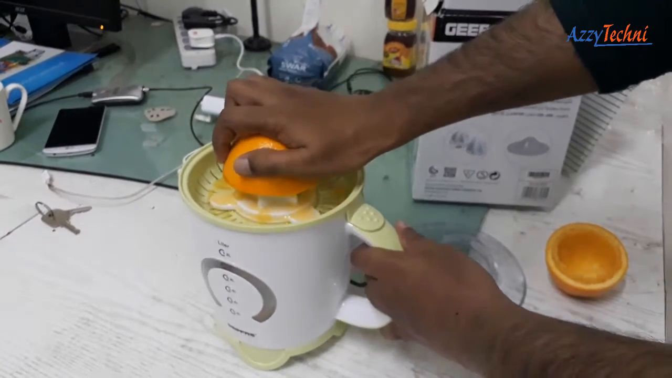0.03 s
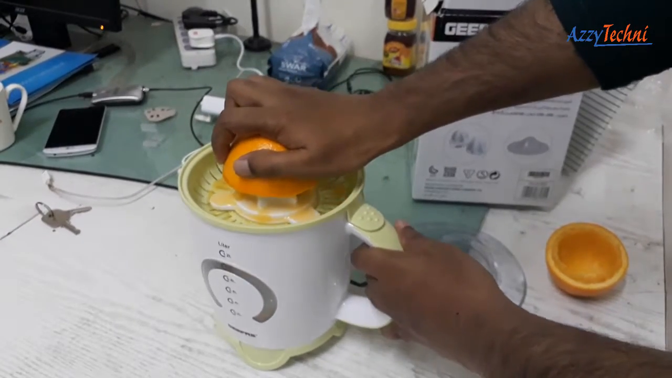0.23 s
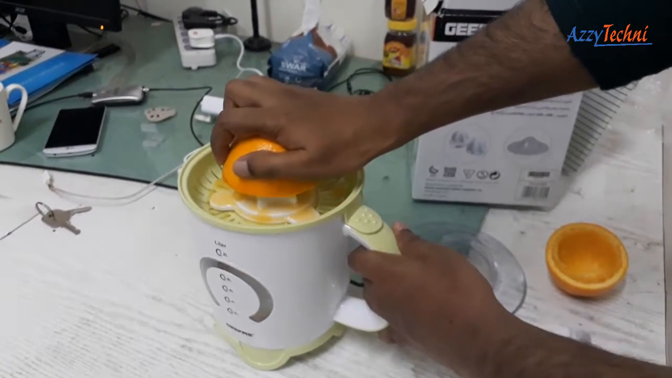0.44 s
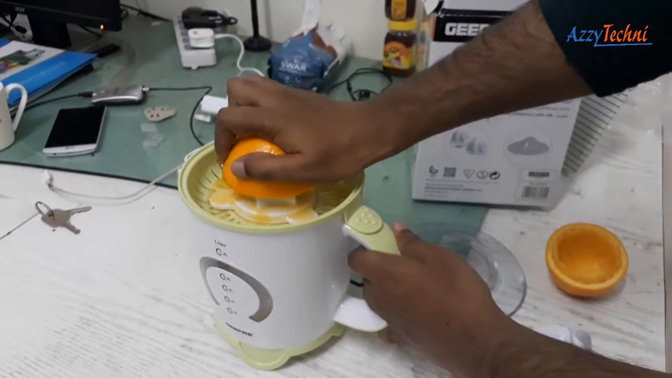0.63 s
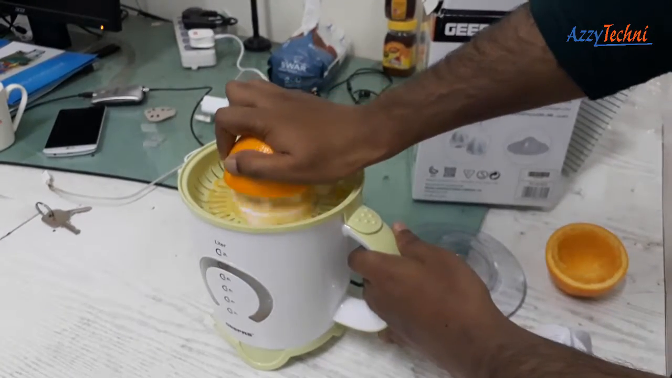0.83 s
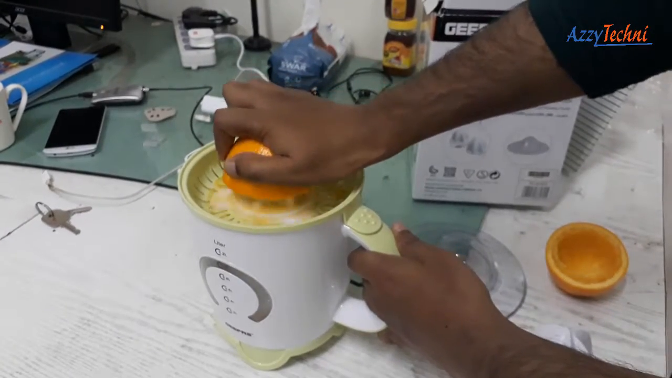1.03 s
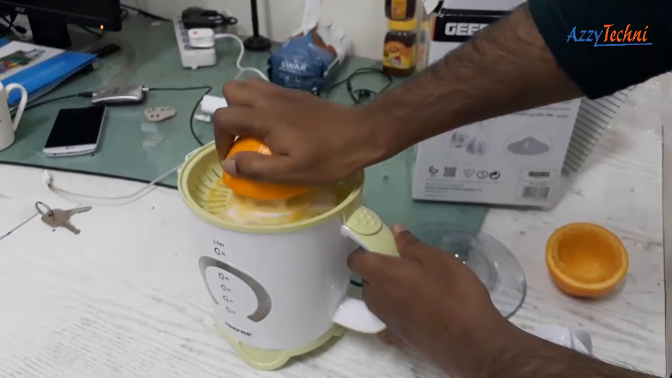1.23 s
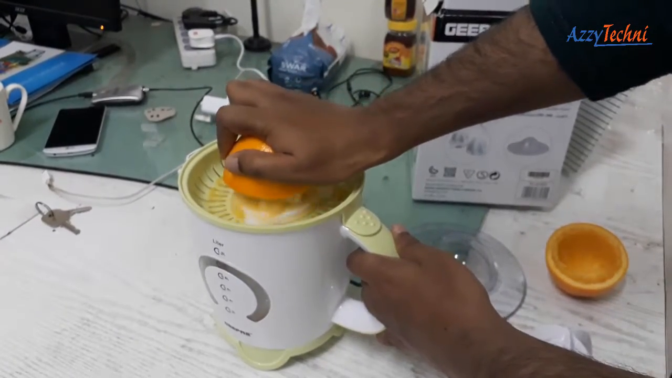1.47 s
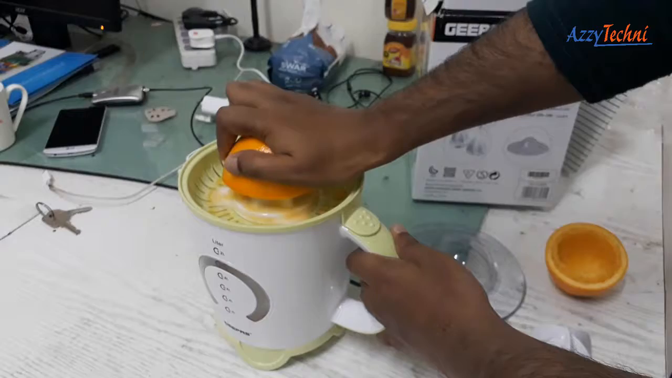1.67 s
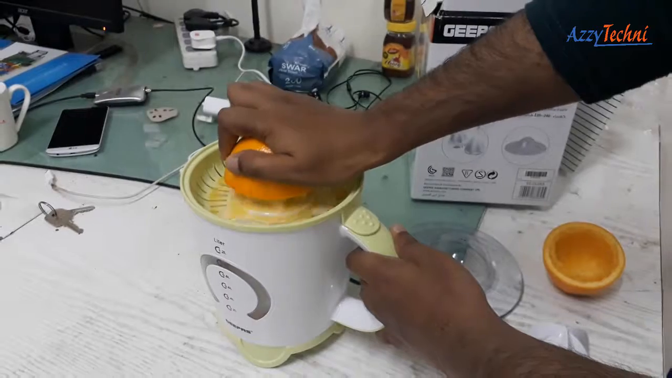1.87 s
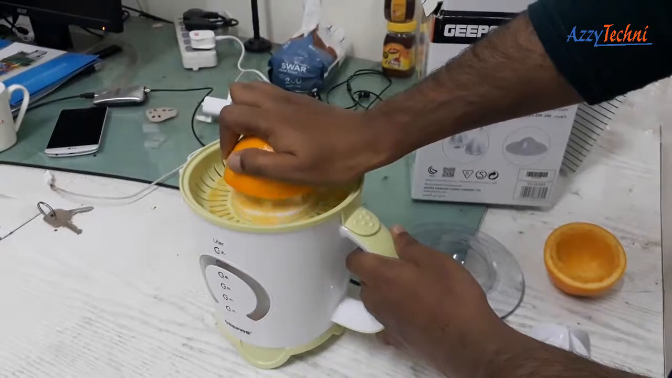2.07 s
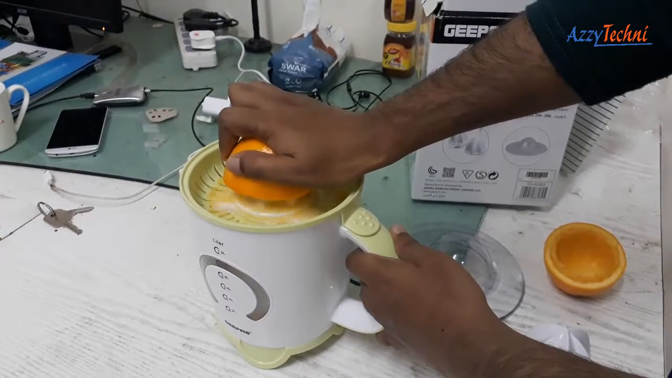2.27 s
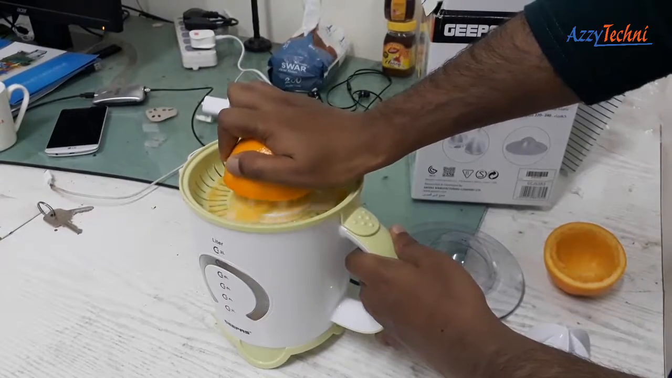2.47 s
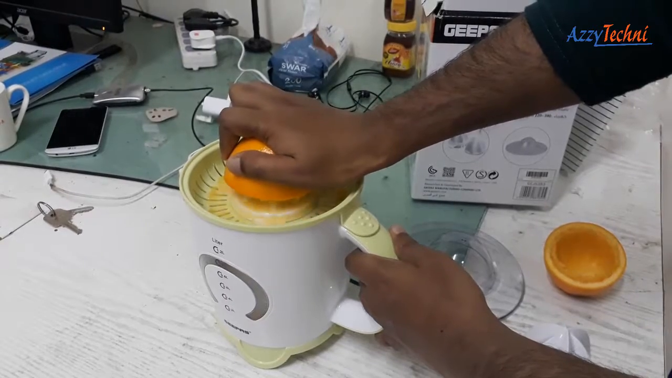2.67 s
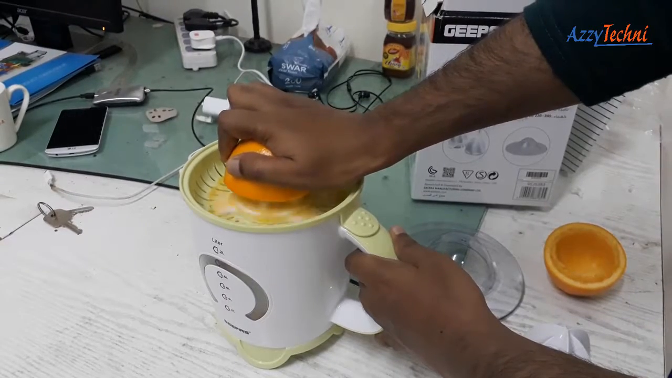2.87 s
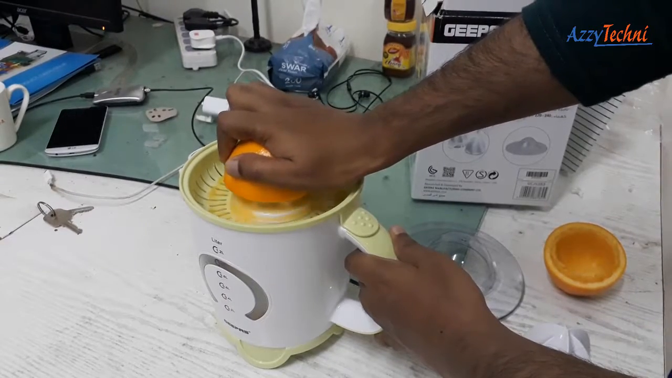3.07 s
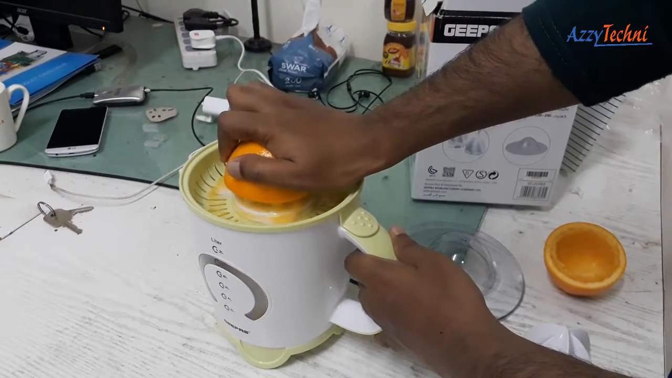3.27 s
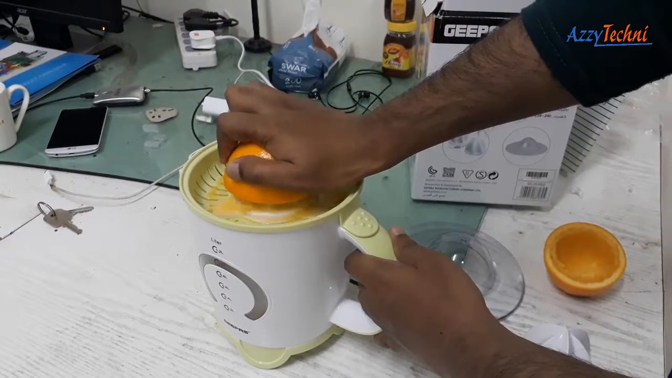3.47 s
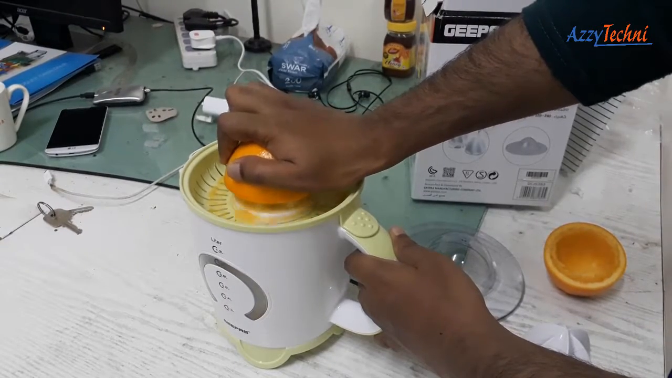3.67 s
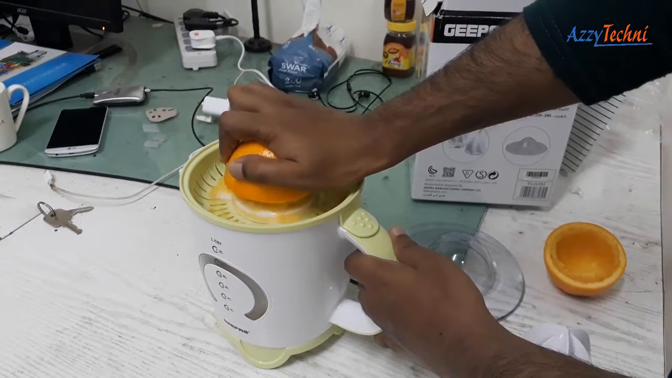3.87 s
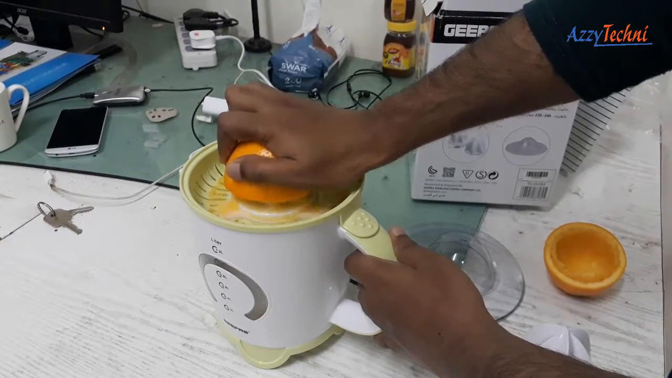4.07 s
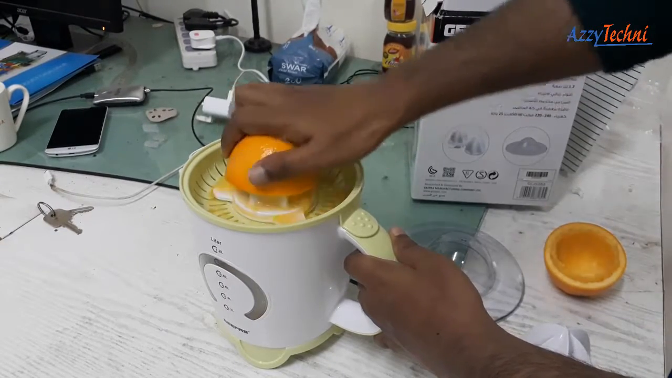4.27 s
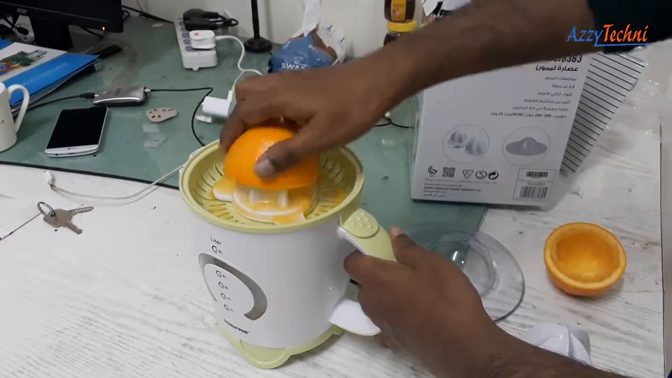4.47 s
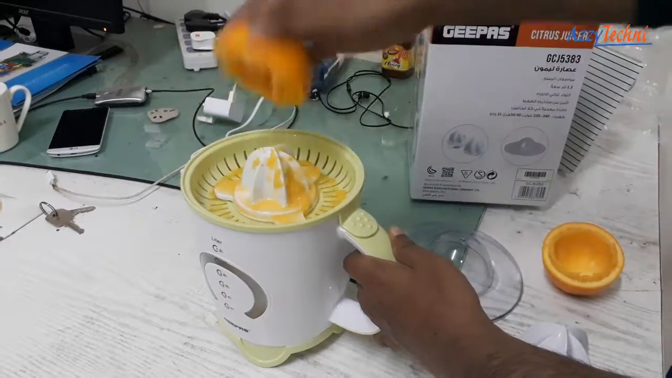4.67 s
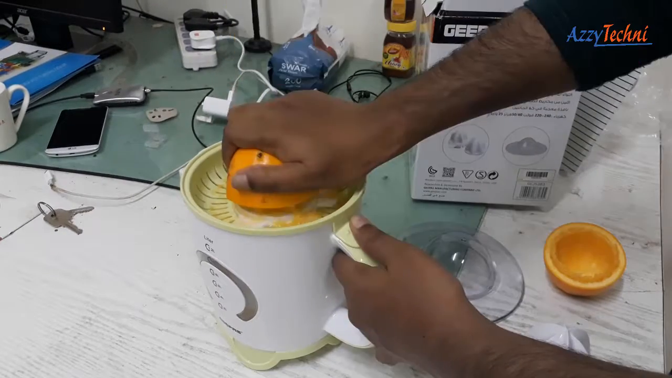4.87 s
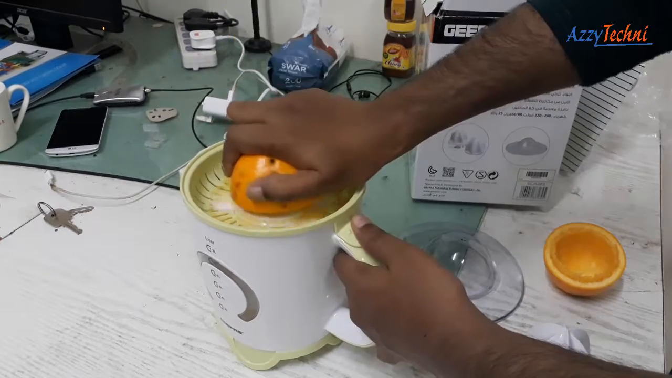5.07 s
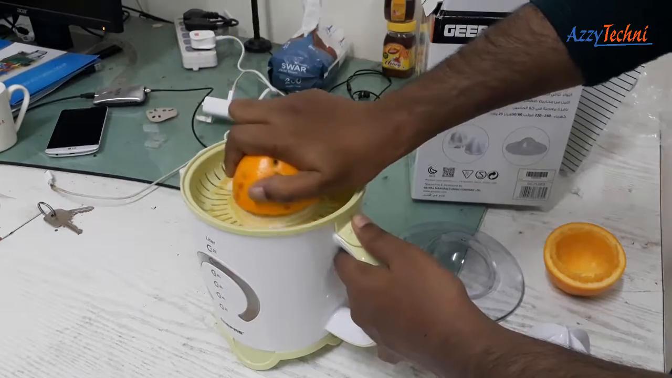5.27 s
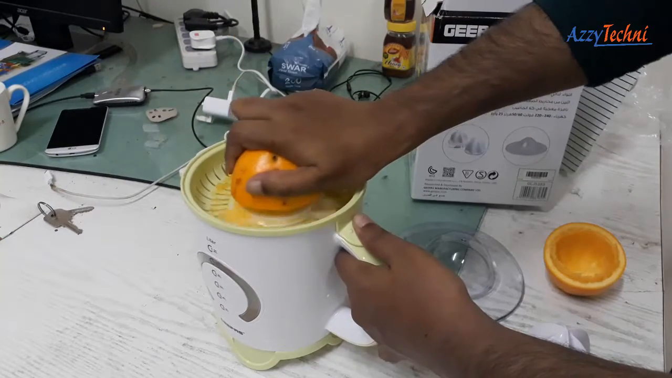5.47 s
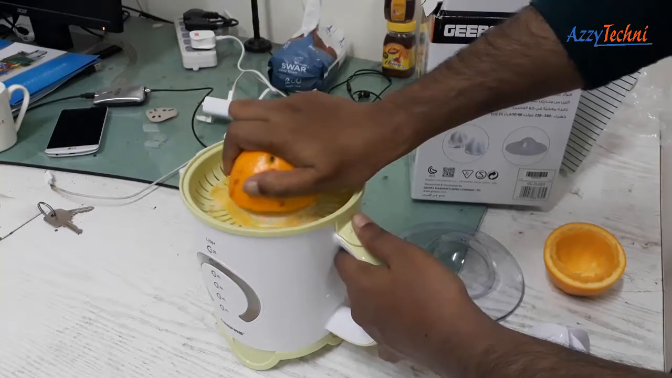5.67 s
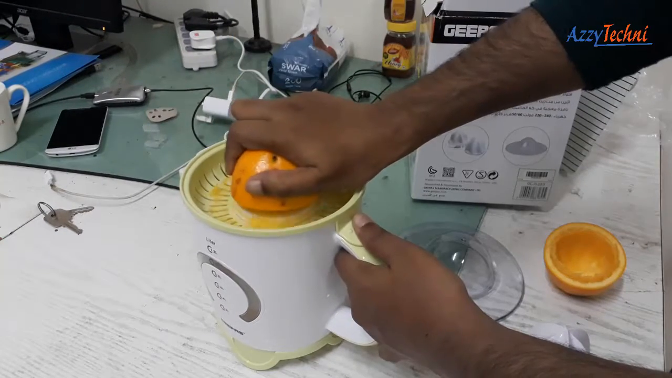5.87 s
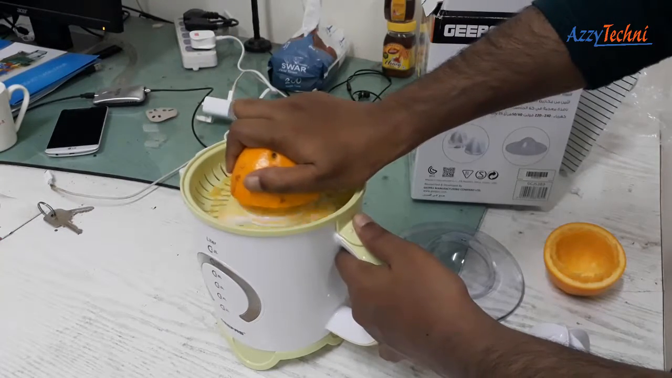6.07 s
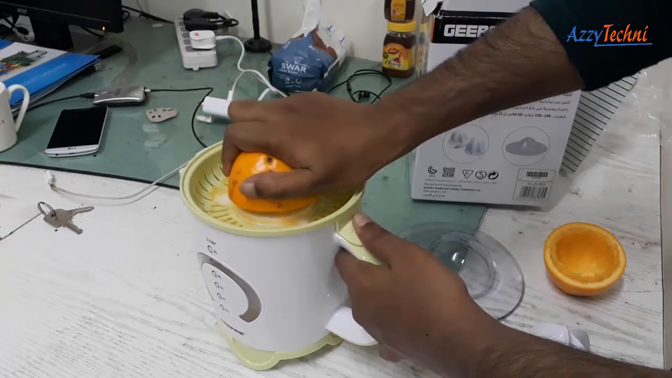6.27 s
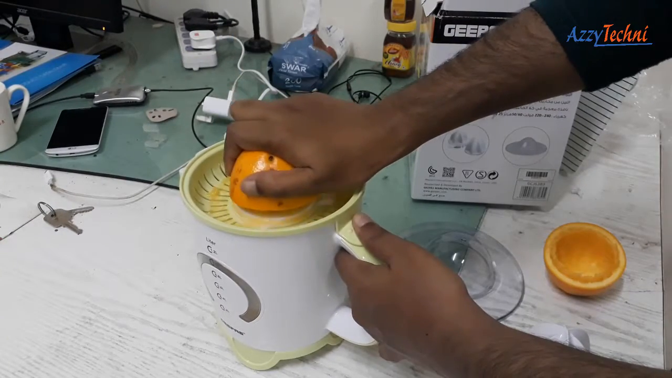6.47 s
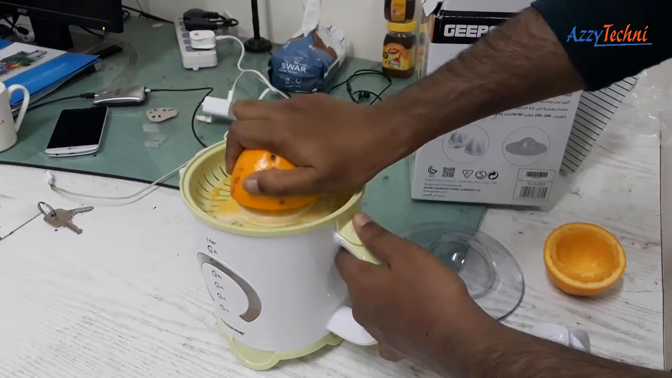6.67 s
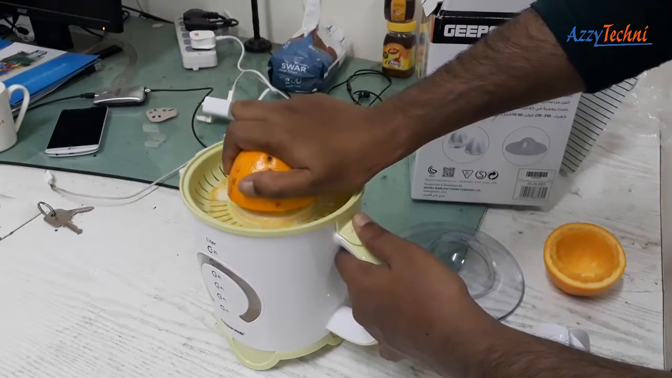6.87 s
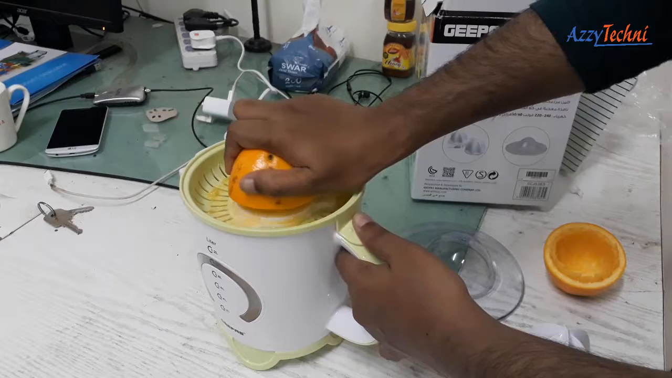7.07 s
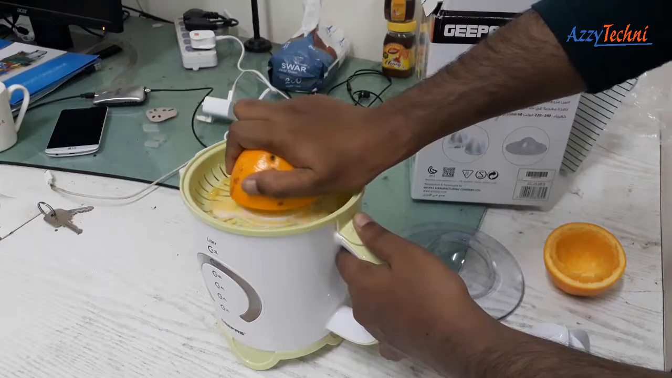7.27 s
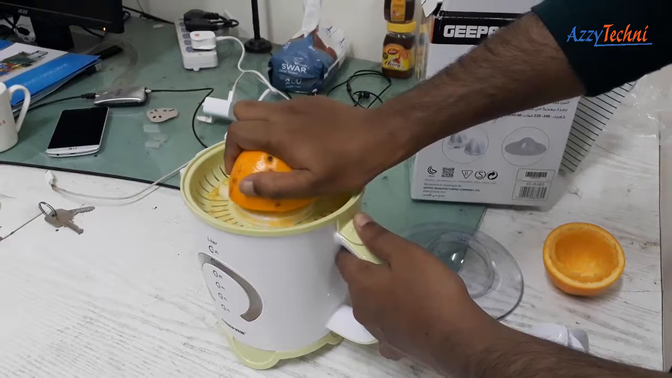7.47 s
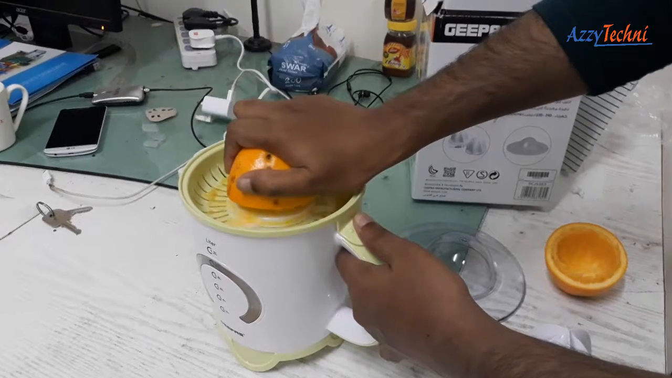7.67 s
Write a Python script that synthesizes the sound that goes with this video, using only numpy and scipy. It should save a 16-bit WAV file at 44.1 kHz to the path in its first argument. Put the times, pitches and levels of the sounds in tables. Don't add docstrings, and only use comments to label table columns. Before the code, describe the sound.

Over low fan noise, a plastic juicer clatters to life, whirs roughly under changing hand pressure, cuts out, and restarts with a slightly different tone.

```python
import sys
import numpy as np
from scipy import signal
from scipy.fft import rfft, irfft
from scipy.io import wavfile
from scipy.ndimage import uniform_filter1d

SR = 44100
rng = np.random.default_rng(int(sys.argv[2]) if len(sys.argv) > 2 else 0)


def gain_from_db(level_db):
    decades = np.asarray(level_db, float) / 20
    return 10 ** decades


def generate_wav(signal):
    frames = np.transpose(np.atleast_2d(signal))
    scaled = np.clip(frames, -1, 1) * 32767
    pcm = np.round(scaled).astype(np.int16)
    wavfile.write(sys.argv[1], SR, pcm)


N = 340011
t = np.arange(N) / SR
MAINS_HZ, GEAR_TURN_HZ = 60, 7.2


def level(x, db):
    return x * gain_from_db(db) / np.sqrt(np.mean(x ** 2))


def ring(x, hz, width):
    b, a = signal.iirpeak(hz, hz / (1.306 * width), fs=SR)
    once = signal.lfilter(b, a, x)
    return signal.lfilter(b, a, once)


def walk(rate):
    hold = int(SR / rate)
    steps = np.repeat(rng.standard_normal(N // hold + 1), hold)
    return 1.03 * uniform_filter1d(steps, hold)[:N]


def span(on_s, off_s):
    return uniform_filter1d(1. * ((t >= on_s) & (t <= off_s)), size=200)


def curve(table):
    s, *columns = np.transpose(table)
    return span(s[0], s[-1] + 1e-3), [np.interp(t, s, c) for c in columns]


def burst(s, ms):
    out = np.zeros(N)
    near = slice(int(s * SR), int((s + .1) * SR))
    u = np.clip(t[near] - s, 0, 1) / (max(ms, .5) / 1000)
    out[near] = (u * np.exp(1 - u)) ** 2
    return out


# f/Hz, level/dB per Hz
FAN_SPECTRUM = [(20, -37), (135, -7), (265, -11.5), (390, -8), (640, -12.5), (2240, -18.5), (3100, -30.5),
                (4200, -71)]
# f/Hz, width/Hz, level/dB
FAN_TONES = [(139.7, 19, -47.5), (194, 13.8, -47), (236.6, 5, -52), (352.2, 7.9, -53)]


def fan():
    hz, db = np.transpose(FAN_SPECTRUM)
    f = np.fft.rfftfreq(N, 1 / SR) + 1
    shape = gain_from_db(np.interp(np.log(f), np.log(hz), db))
    drone = irfft(rfft(rng.standard_normal(N)) * shape, N)
    tones = 0
    for tone_hz, width, tone_db in FAN_TONES:
        tones = tones + level(ring(rng.standard_normal(N), tone_hz, width), tone_db)
    return level(drone, -39.5) + tones


def microphone_hiss():
    noise = rng.standard_normal(N)
    hiss = ring(noise, 3800, 1500) + gain_from_db(-2.5) * ring(noise, 6400, 9000)
    return level(hiss, -69.5)


# t/s, f/Hz, level/dB
SQUEAK = [(0, 12400, -86), (.04, 12800, -80), (.1, 13000, -80), (.16, 13300, -78), (.19, 13000, -77),
          (.215, 12100, -80), (.23, 11900, -95)]
# t/s, level/dB
EARLY_FIZZ = [
    (0, -75),
    (.08, -67),
    (.2, -73),
    (.27, -85),
]
# t/s, level/dB, duration/ms, f/Hz
TAPS = [(.066, -68, 4, 4300), (.066, -59, 4.3, 7400), (.066, -59, 5.5, 9900), (.068, -72, 4.5, 14300),
        (.754, -58, 4.9, 7600), (6.618, -45, 2, 6260), (.66, -68, 4, 8300), (4.53, -75, 19.7, 8300),
        (4.952, -49, 12, 4600), (4.98, -51, 8, 4900)]


def handling():
    gate, (hz, db) = curve(SQUEAK)
    rub = gate * gain_from_db(db + 3.0 * walk(60)) * np.sin(2 * np.pi * np.cumsum(hz) / SR)
    gate, (db,) = curve(EARLY_FIZZ)
    early_fizz = gate * gain_from_db(db) * level(ring(rng.standard_normal(N), 4500, 1400), 0)
    noise = rng.standard_normal(N)
    taps = 0
    for s, tap_db, ms, tap_hz in TAPS:
        taps = taps + burst(s, ms) * level(ring(noise, tap_hz, 1200), tap_db)
    return rub + early_fizz + taps


# first t/s, last t/s
SEAMS = [
    (.0224, 4.6),
    (4.6119, 7.71),
]
SEAM_S = .021323
# t/s, treble peak level/dB
BAD_SEAMS = [(.8114, -47), (.982, -50), (1.1099, -50), (1.3231, -50), (1.9201, -50), (2.0481, -48),
             (2.3466, -50), (2.4532, -49), (2.6239, -50), (2.7091, -46), (2.9224, -47), (3.2209, -46),
             (3.4554, -46), (3.6047, -48), (3.9459, -47), (3.9885, -49), (4.0099, -47), (4.8941, -51),
             (5.209, -49), (5.8061, -47), (5.9767, -50), (6.0194, -47), (6.2752, -50), (6.5098, -42),
             (7.2561, -48), (7.512, -47), (7.5759, -47)]


def seam_ticks(wave):
    slip_db, most = -10, gain_from_db(-35)
    x = np.zeros(N)
    times = np.concatenate([np.arange(first, last, SEAM_S) for first, last in SEAMS])
    at = (times * SR).astype(int)
    x[at] = np.clip(gain_from_db(slip_db) * np.gradient(wave)[at], -most, most)
    for s, db in BAD_SEAMS:
        x[int(s * SR)] = gain_from_db(db + 17.0)
    return signal.sosfilt(signal.butter(2, 6500, "high", fs=SR, output="sos"), x)


# switch closes t/s, rotor grips t/s, stalled level/dB re running, switch opens t/s
RUNS = [
    (0.769, 0.787, -12, 4.223),
    (4.896, 4.945, -5, 7.8),
]
# t/s, chatter level/dB, pressure/0-1
PRESS = [
    [(.79, -21.5, 0.1), (.95, -22, 0.44), (1.28, -20, 0.35), (1.56, -22, 0.3), (2.39, -23, 0.58),
     (2.85, -23.5, 0.7), (3.5, -23, 0.93), (4.06, -22.5, 0.6), (4.18, -19, 0)],
    [(4.95, -21.5, 0.2), (5.1, -24.5, .9), (5.3, -21.5, 0.62), (5.8, -21, 0.12), (6.47, -22, 0.37),
     (6.9, -23, 0.75), (7.31, -22, 0.77), (7.7, -21, 0.5)],
]
# free level/dB, gain at full pressure/dB, start-up extra/dB
COUPLING = [
    [(-8, 6.5, 0), (-3.5, 5.5, 1.5), (-31.5, 3, 7.5)],
    [(-7.5, 5.5, 2), (-7.5, 3, 5), (-38, 5, 7.5)],
]
STALL_FIZZ_DB = [-2, -6]


def motor(k):
    grip_duration_s, settle_s = .008, 0.063
    coast_db_per_s, coast_s = -220, .15
    on_s, grip_s, stall_db, off_s = RUNS[k]
    _, (db, pressure) = curve(PRESS[k])
    stalled = np.clip((grip_s + grip_duration_s / 2 - t) / grip_duration_s, 0, 1)
    coast_db = coast_db_per_s * np.clip(t - off_s, 0, 1)
    settling = np.exp(-np.clip(t - grip_s, 0, 9) / settle_s)
    bands = []
    for free_db, gain_db, new_db in COUPLING[k]:
        bands.append(free_db + gain_db * pressure + new_db * settling)
    low_db, ring_db, fizz_db = bands
    fizz_db = fizz_db + STALL_FIZZ_DB[k] * stalled
    return span(on_s, off_s + coast_s), db + stall_db * stalled + coast_db, (low_db, ring_db, fizz_db)


def chatter(per_s, spread_db):
    hit = rng.random(N) < per_s / SR
    size = rng.standard_normal(N) * gain_from_db(spread_db * rng.standard_normal(N))
    return level(hit * size, 0)


def housing(modes, steady, throb):
    out = 0
    for hz, width, db, share in modes:
        share = np.clip(share, 0, 1)
        drive = np.sqrt(1 - share) * steady + np.sqrt(share) * throb
        polarity = 2 * rng.integers(0, 2, N) - 1
        out = out + gain_from_db(db + 1.0 * walk(6)) * ring(polarity * drive, hz, width)
    return level(out, 0)


# f/Hz, width/Hz, level/dB, mains-throbbing share/0-1
BASE_MODES = [
    [(571, 156, -8.5, 0.08), (625, 22, -3, 0), (692, 35, -3.5, 0.25), (767, 85, -2.5, 0.18),
     (822, 10.2, 8, 0), (868, 87, -4.5, 0.08), (945, 54, -1.5, 0.3)],
    [(574, 89, -13, 0.99), (627.3, 16, -6.5, 0.3), (697.4, 31, -6.5, .3), (726, 66, -7.5, 0.46),
     (840, 22, -5, 0.3), (844, 72, -6, 0.8), (953.4, 54.5, -0.1, 0.37)],
]
BOWL_MODES = [
    [(1150, 154, -14, 0.075), (1286, 103, 2, 0.15), (1388, 56, 4, 0.042), (1470, 66, -7, 0.094)],
    [(1108, 91, -8.5, 0.34), (1212, 48, 0.5, .2), (1343, 130, 1, 0.21), (1466, 80, -0.5, 0.07)],
]
SHELL_MODES = [
    [(1597, 120, -1, 0.73), (1745, 168, 1.5, 0.84), (1966, 140, -1.5, 0.43), (2174, 235, -3.5, 0.4),
     (2410, 230, -8, 0.29), (2687, 254, -6, 0.29), (3070, 120, -32, 0.31)],
    [(1643, 150, 4, 0.33), (1776, 140, 3, 0.55), (1905, 176, 3.5, 0.46), (2307, 154, -0.5, 0.54),
     (2521, 193, 1, 0.35), (2870, 250, -15, 0.26), (2870, 160, -20, 0.3)],
]
FIZZ_MODES = [
    [(4460, 250, 2.5, 0.58), (5060, 1300, -1, 0.18), (6610, 490, 5, 0.48), (7500, 2200, -10, 0.67)],
    [(3800, 720, -17, 0.52), (4390, 240, 10.5, 0.4), (5160, 970, 7.5, 0.48), (5800, 570, 1, 0.41),
     (6500, 490, 9.5, 0.35), (7670, 900, -4.5, 0.51)],
]
AIR_MODES = [
    [(9100, 580, -15.5, .6), (9140, 1200, 4.5, 0.54), (10270, 1300, 0, 0.47), (12400, 3000, -8.5, .6)],
    [(8700, 750, 2, 0.51), (10200, 1200, -0.5, .6), (12500, 2700, -13.5, .6)],
]
# switched on t/s, level/dB, extra while gears bed in/dB, fade/s
AIR = [
    (.79, -15.5, 10.5, 0.54),
    (4.95, -14, -1, 0.34),
]
# a swell t/s, depth/dB
WOBBLE = [(.81, 1.18), (5.412, 1.05)]


def gears():
    out = 0
    pull = np.exp(0.9 * np.cos(2 * np.pi * 2 * MAINS_HZ * (t - .0009)))
    for k in range(len(RUNS)):
        gate, db, (low_db, ring_db, fizz_db) = motor(k)
        on_s, top_db, fresh_db, fade_s = AIR[k]
        bedding_in = np.exp(-(np.clip(t - on_s, 0, 9) / fade_s) ** 2)
        air_db = fizz_db + top_db + fresh_db * bedding_in
        swell_s, depth_db = WOBBLE[k]
        swell = depth_db * np.cos(2 * np.pi * GEAR_TURN_HZ * (t - swell_s))
        catch = 0.62 * np.cos(2 * np.pi * 5 * GEAR_TURN_HZ * t + 1.9 * walk(3)) + 0.63 * walk(60)
        steady = chatter(7000, 2.56)
        throb = level(pull * chatter(7000, 3.24), 0)
        bands = [(BASE_MODES, low_db), (BOWL_MODES, ring_db), (SHELL_MODES, 0),
                 (FIZZ_MODES, fizz_db), (AIR_MODES, air_db)]
        for modes, rel_db in bands:
            out = out + gate * gain_from_db(db + swell + catch + rel_db) * housing(modes[k], steady, throb)
    return out


# t/s, peak level/dB
KNOCKS = [(0.79, -3), (0.818, -4), (0.846, -3.5), (0.87, -5), (0.894, -6), (0.922, -7), (0.944, -8),
          (4.899, -10), (4.951, -14), (5.003, -4), (5.032, -4), (5.061, -2.5), (5.09, -8.5), (5.098, -7),
          (5.124, -5), (5.164, -4), (5.2, -5), (5.232, -4), (5.26, -5.5), (5.286, -9.5), (5.317, -11.5)]
# f/Hz, width/Hz, level/dB
KNOCK_MODES = [
    [(940, 140, -1.5), (1393, 87, -0.5), (1784, 290, 3.5), (2390, 180, -4), (6760, 810, -24),
     (4350, 710, -24.5)],
    [(946, 70, -3.5), (1700, 75, -4), (1912, 120, -1.5), (2530, 150, -8), (6470, 500, -40)],
]


def knocks():
    blows = sum(gain_from_db(db - 9.5) * burst(s - .002, 5.1) for s, db in KNOCKS)
    out = 0
    for k, modes in enumerate(KNOCK_MODES):
        body = 0
        for hz, width, db in modes:
            phase = 2 * np.pi * hz * t + 1.47 * walk(width)
            body = body + gain_from_db(db + 2.2 * walk(90)) * np.sin(phase)
        in_this_run = (t > 4.5) == k
        out = out + blows * in_this_run * level(body, 0)
    return out


def room(x):
    t60_s, tail_db = 0.31, -8
    u = np.arange(int(.6 * SR)) / SR
    tail = rng.standard_normal(len(u)) * np.exp(-np.log(1000) * u / t60_s) * (u > .003)
    wet = signal.fftconvolve(x, tail / np.sqrt(np.sum(tail ** 2)))[:N]
    return (x + gain_from_db(tail_db) * wet) / np.sqrt(1 + gain_from_db(2 * tail_db))


# in step t/s, resting level/dB
HUM = [(.9, -41), (5.3, -43)]
# mains multiple, level/dB
HUM_ORDERS = [
    [(9, -9.5), (11, 0.5), (13, -33)],
    [(9, -7), (11, -2), (13, -5), (27, -14)],
]
# middle t/s, length/s, level/dB re rest
SINGING = [(0.998, 0.2, 7.5), (1.414, 0.42, 8), (1.827, 0.58, 11.5), (2.303, 0.34, 13.5),
           (2.902, 0.45, 11.5), (3.34, 0.18, 7), (3.6, .3, 3), (4.186, 0.26, 7), (5.503, 0.59, 7),
           (6.0, 0.38, 8), (6.39, 0.71, 6.5), (6.744, 0.29, 7), (7.3, .5, 1.5)]


def coil_hum():
    edge_s = .1
    spells = []
    for s, length_s, db in SINGING:
        spells.append(db * np.clip(.5 + (length_s / 2 - abs(t - s)) / edge_s, 0, 1))
    sing_db = np.max(spells, axis=0)
    out = 0
    for (from_s, db), orders, run in zip(HUM, HUM_ORDERS, RUNS):
        gate = span(from_s, run[3] + 0.055)
        for order, rel_db in orders:
            phase = 2 * np.pi * order * MAINS_HZ * t + 0.13 * walk(4.4)
            loudness = gain_from_db(db + sing_db + rel_db + 1.2 * walk(6.1))
            out = out + gate * loudness * np.sqrt(2) * np.sin(phase)
    return out


# t/s, level/dB
DESK_BUZZ = [
    (.9, -75),
    (1.05, -43.5),
    (4.25, -44.5),
    (4.4, -56),
]


def desk_buzz():
    gate, (db,) = curve(DESK_BUZZ)
    return gate * gain_from_db(db + 0.99 * walk(3.1)) * np.sqrt(2) * np.sin(2 * np.pi * 2 * MAINS_HZ * t)


def scene():
    machine = room(gears() + knocks())
    return (fan() + handling() + machine + coil_hum() + desk_buzz())[None]


def band_limit(x):
    return signal.sosfilt(signal.butter(12, 15630, fs=SR, output="sos"), x)


def record(dry):
    dry = dry - 0.43 * ring(dry[0], 3625, 710)
    mix = dry + microphone_hiss() + seam_ticks(dry[0])
    return band_limit(mix)


dry = scene()
out = record(dry)
generate_wav(out)
```